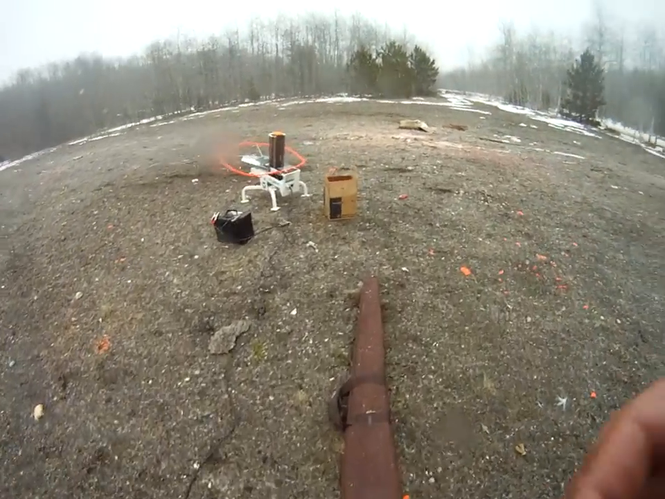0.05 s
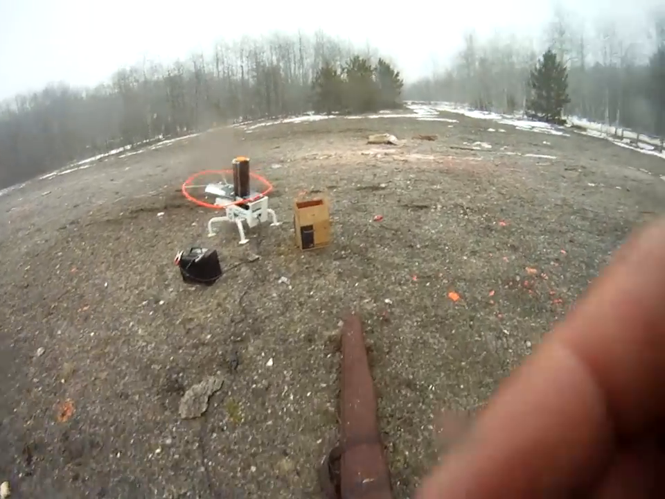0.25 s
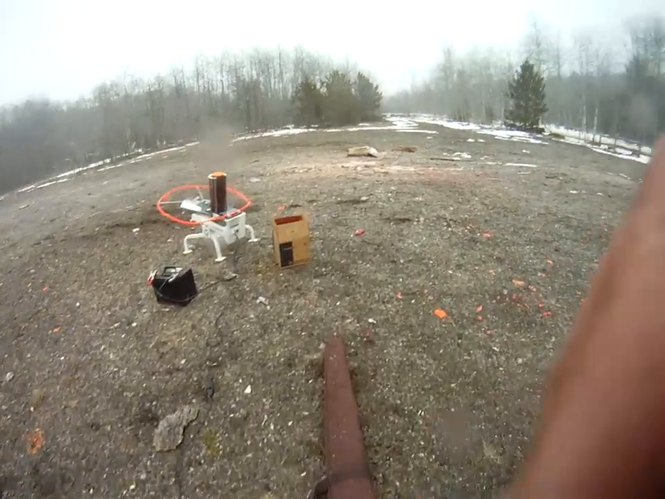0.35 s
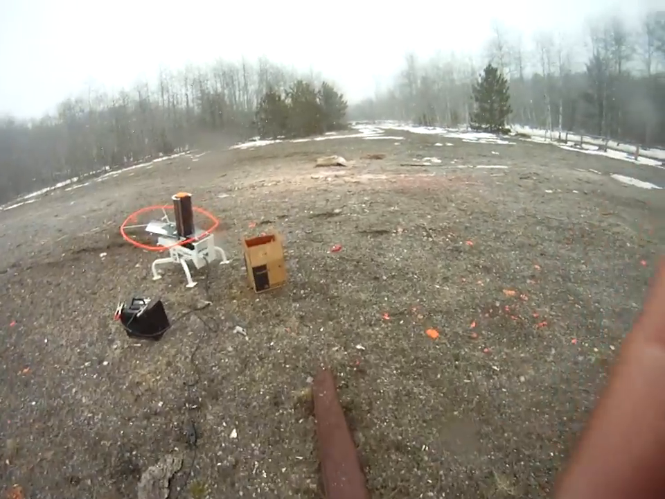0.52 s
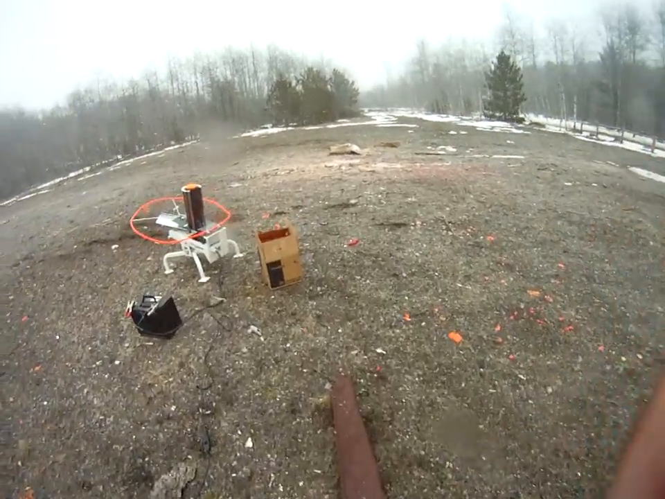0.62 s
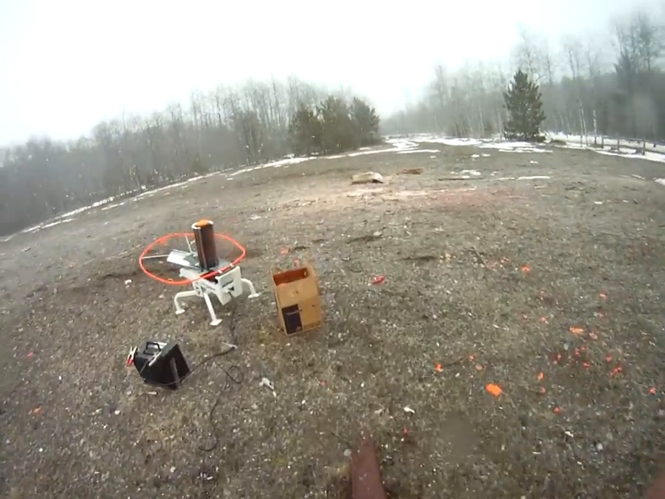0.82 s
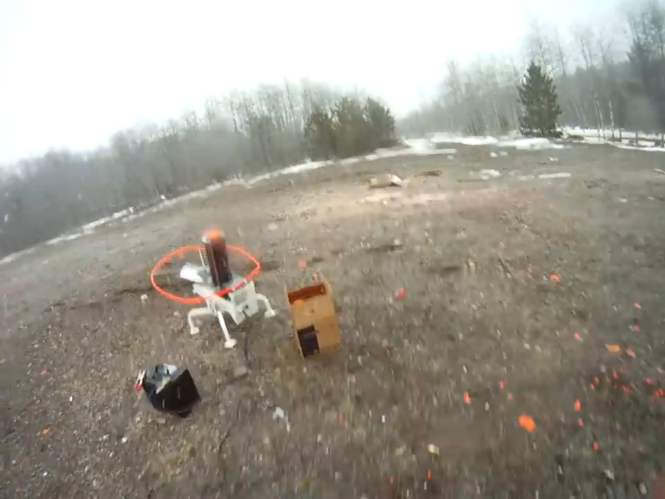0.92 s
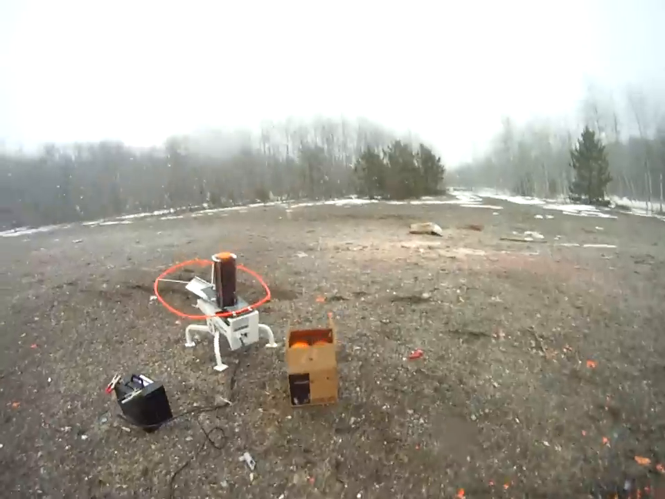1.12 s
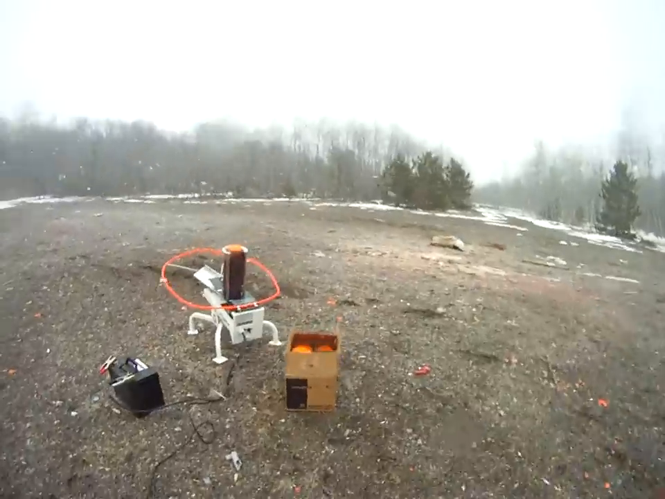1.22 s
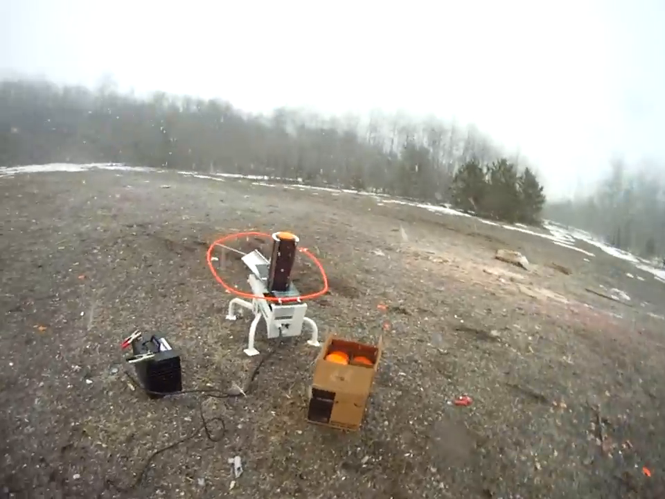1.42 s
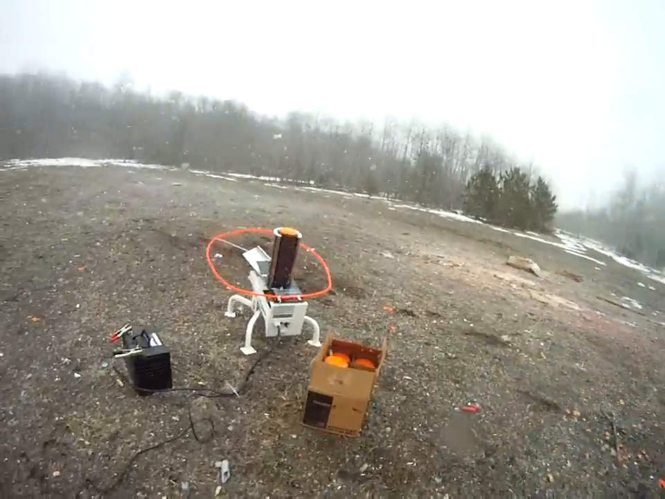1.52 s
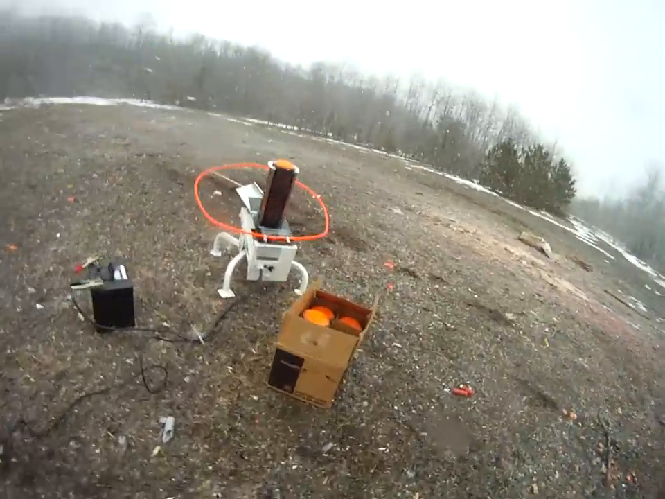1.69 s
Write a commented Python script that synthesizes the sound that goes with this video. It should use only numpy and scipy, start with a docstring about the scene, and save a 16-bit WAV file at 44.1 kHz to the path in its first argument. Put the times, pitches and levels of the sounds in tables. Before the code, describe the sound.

Close metallic clack of a shotgun closing, then rubbing, clicks and scraping steel.

```python
"""A shotgun is handled outdoors, right at a small camera: light ticks, then its steel action clacks shut.
The parts rebound and chatter, a sprung catch pings and the barrel hums on. A hand bumps and drags along
the stock, a sleeve rubs, a part slides home with a rasp, and steel scrapes and squeals on steel.
Movement rumbles in the microphone; the recorder samples coarsely and mirrors the sound into the treble."""
import sys
import numpy as np
from scipy import signal
from scipy.fft import rfft, irfft, next_fast_len
from scipy.io import wavfile

SR = 44100
rng = np.random.default_rng(int(sys.argv[2]) if len(sys.argv) > 2 else 0)


def unload_wav(signal):
    """Save mono or channel-first audio to the path in sys.argv[1] as 16-bit WAV at rate SR, clipped to [-1, 1]."""
    wavfile.write(
        sys.argv[1],
        SR,
        np.round(np.clip(np.atleast_2d(signal).T, -1, 1) * 32767).astype(np.int16),
    )


N = 77175


def amp(db):
    """Decibels to gain."""
    return 10 ** (np.asarray(db) / 20)


def unit(x):
    """Scale to rms 1."""
    return x / np.sqrt(np.mean(x ** 2) + 1e-20)


def eq_gain(curve, hz):
    """The gain of an EQ curve drawn in dB over log frequency."""
    points_hz, points_db = np.transpose(curve)
    return amp(np.interp(np.log(hz + 1), np.log(points_hz + 1), points_db))


def filtered(x, response):
    """Apply a gain that depends on frequency."""
    size = next_fast_len(N + SR // 2)
    return irfft(rfft(x, size) * response(np.fft.rfftfreq(size, 1 / SR)), size)[:N]


def passband(hz, cutoff_hz=5950):
    """The recorder's steep input low-pass."""
    return 1 / np.sqrt(1 + (hz / cutoff_hz) ** 60)


def coloured(x, curve, tilt_db=0):
    """EQ and tilt a signal inside the recorder's band, at rms 1."""
    return unit(filtered(x, lambda hz: eq_gain(curve, hz) * amp(tilt_db * np.log2(hz + 1)) * passband(hz)))


def noise(curve, tilt_db=0):
    """Coloured noise at rms 1."""
    return coloured(rng.standard_normal(N), curve, tilt_db)


def low_cut(x, cutoff_hz):
    """A gentle second-order high-pass below the given cutoff."""
    return signal.sosfilt(signal.butter(2, cutoff_hz, 'high', fs=SR, output='sos'), x)


def since(start_s):
    """Seconds since a cue, zero before it."""
    return np.maximum(np.arange(N) / SR - start_s, 0)


def fade(t, t60_s):
    """Exponential decay, 60 dB down at t60_s."""
    return np.exp(-np.log(1000) * t / t60_s)


def burst(start_s, curve, t60_s, tilt_db=0, attack_s=0.00008):
    """A sharp contact: dense resonances that die at once."""
    t = since(start_s)
    envelope = fade(t, t60_s) * (1 - np.exp(-t / attack_s))
    hit = envelope * noise(curve, tilt_db)
    return hit * np.linalg.norm(envelope) / np.linalg.norm(hit)


def ring(start_s, modes, decay_scale=1, scatter_db=2, detune=0.0039, attack_s=0.0011):
    """Damped modes whose level, tuning and polarity vary with each blow."""
    t = since(start_s)
    out = np.zeros(N)
    for hz, db, t60_s in modes:
        level_draw, pitch_draw, sign_draw = rng.standard_normal(3)
        tone = np.sign(sign_draw) * np.cos(2 * np.pi * hz * (1 + detune * pitch_draw) * t)
        out += amp(db + scatter_db * level_draw) * fade(t, t60_s * decay_scale) * tone
    return out * (1 - np.exp(-t / attack_s))


def strokes(cues):
    """The envelope of strokes that rise, hold and die away, summed in power."""
    power = np.zeros(N)
    for start_s, rise_s, hold_s, t60_s, db in cues:
        attack = np.minimum(since(start_s) / rise_s, 1)
        release = fade(since(start_s + rise_s + hold_s), t60_s)
        power += (amp(db) * attack * release) ** 2
    return np.sqrt(power)


def friction(cues, curve, hiss_db, slips_per_s=4500, spread_db=2.5):
    """Tiny slips of uneven size over a smooth hiss, through the body's resonances."""
    slips = (rng.random(N) < slips_per_s / SR) * rng.choice([-1, 1], N)
    sizes = amp(spread_db * np.minimum(rng.exponential(size=N), 4))
    texture = unit(slips * sizes) + amp(hiss_db) * rng.standard_normal(N)
    return strokes(cues) * coloured(texture, curve)


# Rumble fader ride: time_s, level_db
RUMBLE_RIDE = [(0, -54), (0.198, -49), (.41, -47), (.46, -28), (.51, -40), (.6, -41), (.72, -36.5),
               (.83, -45), (.89, -42), (.96, -33), (1.2, -38), (1.359, -43.5), (1.43, -45), (1.473, -23),
               (1.54, -31), (1.66, -33.5), (1.75, -43.5)]
# Tone of the rumble and of the air: freq_hz, gain_db
RUMBLE_EQ = [(10, -13), (25, 12), (38, 2), (60, -4), (100, -12), (200, -35), (400, -41), (1000, -74)]
AIR_EQ = [(88, -36.5), (150, 1.5), (440, -10), (554, -9.5), (607, -10), (878, -12), (1950, -14),
          (5380, -22), (5900, -32), (7670, -64), (13000, -120)]


def rumble_and_air(air_db=-63.5):
    """Movement rumbles in the microphone over a quiet bed of open air."""
    rumble_db = np.interp(np.arange(N) / SR, *np.transpose(RUMBLE_RIDE))
    return amp(rumble_db) * noise(RUMBLE_EQ) + amp(air_db) * noise(AIR_EQ)


# Dry ticks: start_s, level_db, t60_s, tilt_db_per_octave
TICK_CUES = [(0.0529, -29, .012, 7), (0.1116, -38.5, 0.016, 3), (0.1225, -52, 0.0177, 0),
             (0.1443, -31.5, .016, 0.5), (.1598, -37, 0.011, 8.5), (0.1881, -38, 0.012, 5),
             (.3920, -55, 0.018, 22), (0.4387, -23, 0.01, -4.5), (0.4732, -25.5, 0.012, 5.5),
             (.6595, -23, 0.026, 5), (0.9104, -36.5, 0.0145, 0.5), (1.1397, -17, 0.013, -1),
             (1.1419, -16, 0.0205, 0.5), (1.2112, -36.5, 0.02, 1.5), (1.4169, -47, .024, 5),
             (1.4558, -31, 0.018, 4), (1.4869, -29, 0.015, 4), (1.5510, -13.5, 0.016, -6.5),
             (1.5643, -22, 0.016, -1), (1.5980, -31.5, 0.019, 18)]
# Their bright tone: freq_hz, gain_db
TICK_EQ = [(150, -47), (700, -24), (1300, -7), (1800, -4.5), (2300, 6.5), (2800, -3.5), (3400, 0.5),
           (4200, -15.5), (5200, -11.5), (5900, -32)]


def ticks():
    """Loose parts touch without ringing."""
    hits = sum(amp(db) * burst(start_s, TICK_EQ, t60_s, tilt_db)
               for start_s, db, t60_s, tilt_db in TICK_CUES)
    return low_cut(hits, cutoff_hz=751)


# Pings of the catch: start_s, level_db
PING_CUES = [(0.066, -21.5), (0.195, -29), (0.2671, -7.5)]
# Its modes: pitch_hz, level_db, t60_s
CATCH_MODES = [(1185, -15, .065), (2450, 1.5, 0.026), (3590, -8.5, 0.036), (3670, -20, 0.029)]


def catch_pings():
    """A small sprung catch rings briefly."""
    return sum(amp(db) * ring(start_s, CATCH_MODES) for start_s, db in PING_CUES)


# The action closing: start_s, level_db, crack_over_ring_db, crack_tilt_db_per_octave, decay_scale
CLACK_CUES = [(0.2131, -1.5, 3, -2.5, 0.63), (0.2153, -8.5, 2.5, -0.5, 0.19), (0.2246, -7, -14, 3, 0.72),
              (.2305, -11.5, -10.5, 3, 0.93), (.2330, -12, -7, 7.5, .35), (.2450, -4, -6, 7.5, .45),
              (0.266, -14.5, -3.5, 4.5, .6), (.3020, -32, -5.5, 3.5, .7), (.3100, -19, 0.5, -2, 0.72)]
# Its steel ring: pitch_hz, level_db, t60_s
ACTION_MODES = [(876, -23, 0.044), (1030, -11.5, 0.065), (1170, -11, 0.16), (1520, -24.5, 0.052),
                (1836, -10.5, .04), (2027, 3.5, .045), (2078, -4.5, 0.029), (2410, -2, 0.042),
                (3740, -11.5, .035), (3860, -16.5, 0.066), (4720, -24.5, 0.027), (5190, -25.5, 0.022)]
# Tone of the crack: freq_hz, gain_db
CRACK_EQ = [(80, -32), (220, -20), (340, -5.5), (500, 1), (720, -0.5), (1000, 3), (1500, 1), (2400, 7.5),
            (3000, -2.5), (4000, -10.5), (5800, -21)]


def action_clacks():
    """Steel parts slam together and rebound, each blow a crack and a short ring."""
    out = np.zeros(N)
    for start_s, db, crack_db, tilt_db, decay_scale in CLACK_CUES:
        steel = ring(start_s, ACTION_MODES, decay_scale)
        crack = burst(start_s, CRACK_EQ, t60_s=0.013, tilt_db=tilt_db)
        out += amp(db) * (steel + amp(crack_db) * crack)
    return low_cut(out, cutoff_hz=330)


# Soft bumps through the stock: start_s, knock_db, thump_db
BUMP_CUES = [(0.2147, -15.5, -33.5), (.4470, -25.5, -29), (.5400, -14, -8), (0.8729, -30, -27),
             (1.1406, -31, -46)]
# Tone of the knock: freq_hz, gain_db
KNOCK_EQ = [(60, -3), (220, -2), (400, -3.5), (700, -7.5), (1250, 5), (1600, -14), (2100, 1.5), (3000, -21),
            (4300, -12), (5800, -30.5)]


def stock_bumps(thump_hz=48.3, thump_s=0.016, attack_s=0.0007):
    """A dull knock and one heavy, damped swing of the microphone."""
    out = np.zeros(N)
    for start_s, knock_db, thump_db in BUMP_CUES:
        t = since(start_s)
        envelope = (1 - np.exp(-t / attack_s)) / (1 + (t / thump_s) ** 4)
        swing = -np.cos(2 * np.pi * thump_hz * t) * envelope
        out += amp(knock_db) * burst(start_s, KNOCK_EQ, t60_s=0.024) + amp(thump_db) * swing
    return out


# Blows that wake the barrel: start_s, level_db, decay_scale
HUM_CUES = [(0.215, -28, 1), (1.1405, -52, 0.91)]
# Its modes: pitch_hz, level_db, t60_s
BARREL_MODES = [(420, -1, 0.34), (728, -12.5, 0.45)]


def barrel_hum():
    """The barrel hums on after firm blows."""
    return sum(amp(db) * ring(start_s, BARREL_MODES, decay_scale, scatter_db=0)
               for start_s, db, decay_scale in HUM_CUES)


# Short rattles: start_s, rise_s, hold_s, release_t60_s, level_db
CHATTER_CUES = [(.218, .004, 0.0096, 0.025, -18.5), (.250, 0.0032, .010, 0.11, -27),
                (.295, 0.00395, 0.0095, 0.017, -25)]
# Their metallic tone: freq_hz, gain_db
CHATTER_EQ = [(350, -67.5), (600, -41.5), (792, -25), (1030, -18), (1160, -2.5), (1240, -9.5),
              (1370, -24.5), (1720, -16.5), (2040, -5.5), (2290, -11), (2450, -13), (2850, -27.5),
              (3730, -15), (3950, -21.5), (4340, -36.5), (4830, -29), (5900, -37), (7670, -67),
              (13000, -120)]


def action_chatter():
    """The action chatters between its blows."""
    return friction(CHATTER_CUES, CHATTER_EQ, hiss_db=-7)


# Hand moves: start_s, rise_s, hold_s, release_t60_s, level_db
DRAG_CUES = [(.340, 0.029, 0.03, .1, -55), (.451, 0.0052, 0.015, 0.057, -28),
             (.482, 0.0027, .031, 0.072, -30)]
# Tone of the grip: freq_hz, gain_db
GRIP_EQ = [(59, -21), (100, 3), (426, -10.5), (551, -16.5), (687, -12), (762, -19), (1130, -3), (1380, -5),
           (1610, -11.5), (1980, -2.5), (3030, -16.5), (3790, -11), (4190, -39), (5330, -22.5), (5900, -42),
           (7670, -63), (13000, -120)]


def hand_drag():
    """The hand grips and slips along the stock."""
    return friction(DRAG_CUES, GRIP_EQ, hiss_db=-5.5)


# Sleeve moves: start_s, rise_s, hold_s, release_t60_s, level_db
RUB_CUES = [(.520, .01, 0.043, 0.17, -44), (.594, 0.0043, 0.098, 0.096, -37),
            (.700, .02, 0.041, 0.52, -43.5), (.850, .09, .04, 0.089, -45.5), (1.030, .01, 0.056, .1, -42),
            (1.068, .012, 0.066, 0.083, -37.5)]
# Tone of the cloth: freq_hz, gain_db
CLOTH_EQ = [(88, -34.5), (150, -1.5), (192, -5.5), (290, -19.5), (426, -15), (497, -22.5), (554, -21),
            (708, -16), (1010, -7.5), (1840, -3.5), (2110, 4.5), (2460, -9.5), (3660, -8), (4080, -18),
            (4980, -19.5), (5380, -21), (5900, -31), (7670, -69.5), (13000, -120)]


def sleeve_rub():
    """Cloth brushes past in soft, grainy strokes."""
    return friction(RUB_CUES, CLOTH_EQ, hiss_db=-4)


# Three pushes, each louder: start_s, rise_s, hold_s, release_t60_s, level_db
SLIDE_CUES = [(.968, .012, .01, 0.033, -33), (.987, 0.0079, .004, 0.026, -18.5),
              (1.000, 0.0086, .016, 0.026, -13)]
# Tone of the rasp: freq_hz, gain_db
RASP_EQ = [(88, -37.5), (150, -17.5), (277, -21), (389, -24), (505, -22.5), (826, -23), (1110, -16.5),
           (1230, -22.5), (1440, -2.5), (1700, -10), (1980, -6), (2170, 1), (2420, -12.5), (2740, -11.5),
           (2910, -22), (3190, -6), (3500, -7.5), (3660, -12.5), (3840, -26), (4830, -20), (5900, -34),
           (7670, -60.5), (13000, -120)]


def part_slide():
    """A part slides home with a rasp, more hiss than grit."""
    return friction(SLIDE_CUES, RASP_EQ, hiss_db=8.5)


# Scrapes: start_s, rise_s, hold_s, release_t60_s, level_db
SCRAPE_CUES = [(1.455, 0.0034, 0.015, 0.072, -23.5), (1.483, 0.0017, 0.005, 0.26, -28.5),
               (1.570, 0.0044, 0.035, .1, -38), (1.624, 0.014, 0.0067, 0.17, -32.5),
               (1.672, 0.0091, 0.024, 0.041, -35.5), (1.728, 0.017, .02, .05, -46)]
# Tone of the steel: freq_hz, gain_db
STEEL_EQ = [(120, -50), (200, -22.5), (389, -15.5), (455, -22.5), (531, -38.5), (612, -36), (715, -13.5),
            (923, -2), (1080, -7.5), (1240, 4.5), (1370, -13.5), (1490, -6), (1600, -9.5), (2100, 0.5),
            (2190, 2.5), (2280, -8.5), (2600, -19), (2870, -17), (3260, -20), (3540, -8), (3700, -12.5),
            (4260, -26), (4770, -24), (5190, -18.5), (5900, -35), (7670, -64), (13000, -120)]


def steel_scrape():
    """Steel sticks and slips on steel."""
    return friction(SCRAPE_CUES, STEEL_EQ, hiss_db=-3)


# Squeals: start_s, rise_s, hold_s, release_t60_s, level_db
SQUEAL_CUES = [(1.483, .003, 0.0022, 0.13, -29), (1.624, 0.0021, 0.017, 0.073, -32)]


def steel_squeal(pitch_hz=3606, half_width_hz=140):
    """The scrape catches and squeals in one narrow resonance."""
    squeal = filtered(rng.standard_normal(N), lambda hz: 1 / (1 + ((hz - pitch_hz) / half_width_hz) ** 2))
    return strokes(SQUEAL_CUES) * unit(squeal)


def scene():
    """The mono mix, close and dry."""
    action = action_clacks() + catch_pings() + barrel_hum() + action_chatter()
    touches = ticks() + stock_bumps()
    rubbing = steel_squeal() + sleeve_rub() + hand_drag() + part_slide() + steel_scrape()
    return (action + touches + rubbing + rumble_and_air())[None]


# What the recorder's smoothing lets through: freq_hz, gain_db
SMOOTHING_EQ = [(6000, 0), (7500, -4), (9000, -9), (10000, -13.5), (11300, -23), (11800, -36), (12000, -60),
                (12200, -36), (12700, -25), (14000, -16), (15100, -13), (15700, -36)]


def record(dry, clip_level=0.84, sample_hz=12000, top_hz=15822):
    """The recorder clips, samples coarsely and leaves mirror images around its sampling rate."""
    clipped = np.clip(dry[0], -clip_level, clip_level)
    sampler = 1 + 2 * np.cos(2 * np.pi * sample_hz * np.arange(N) / SR)
    mirrored = filtered(clipped, passband) * sampler
    smoothed = filtered(mirrored, lambda hz: eq_gain(SMOOTHING_EQ, hz))
    return filtered(np.clip(smoothed, -1, 1), lambda hz: hz < top_hz)[None]


dry = scene()
out = record(dry)
unload_wav(out)
```